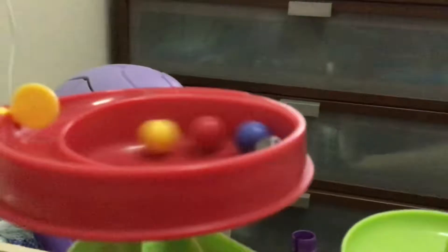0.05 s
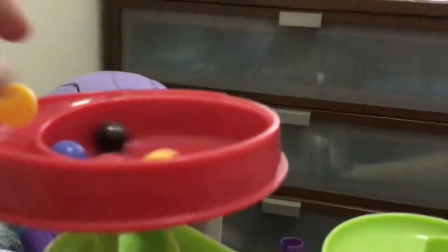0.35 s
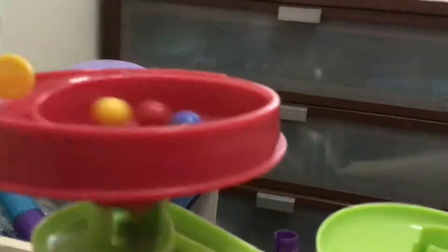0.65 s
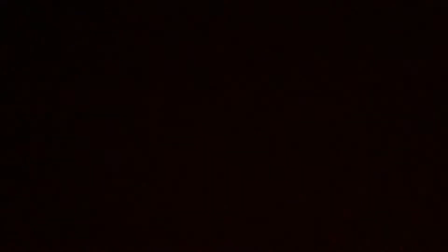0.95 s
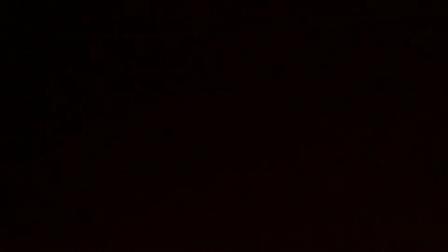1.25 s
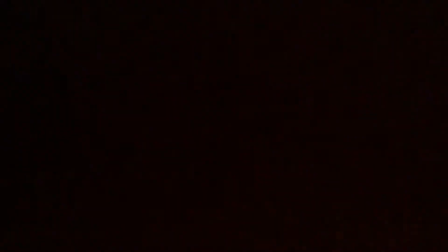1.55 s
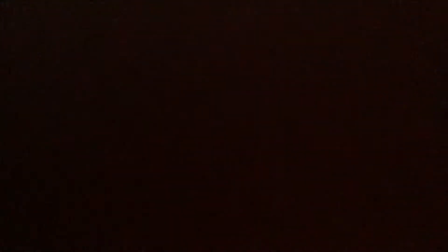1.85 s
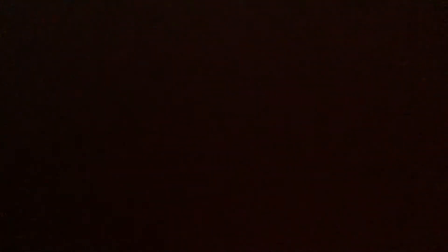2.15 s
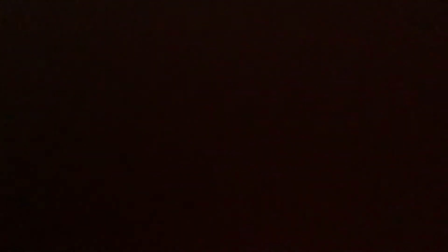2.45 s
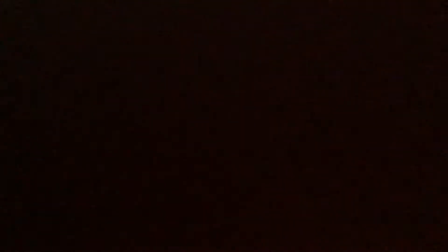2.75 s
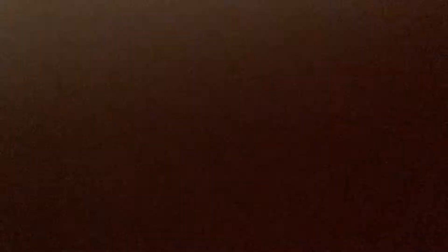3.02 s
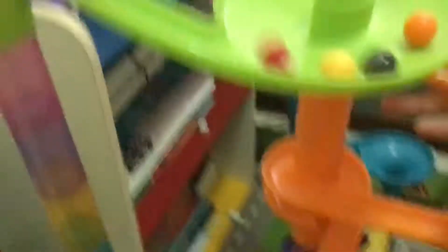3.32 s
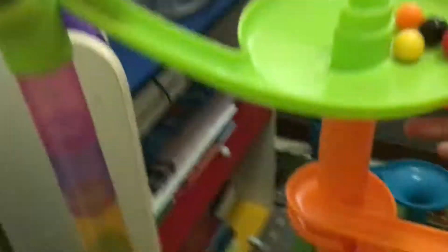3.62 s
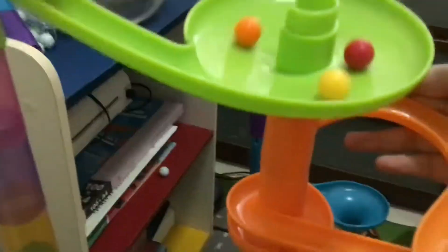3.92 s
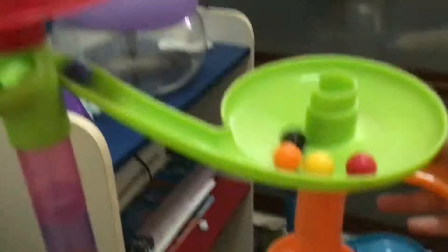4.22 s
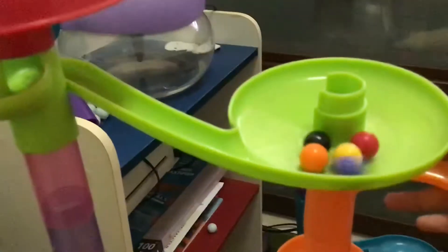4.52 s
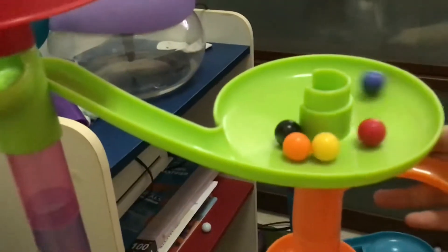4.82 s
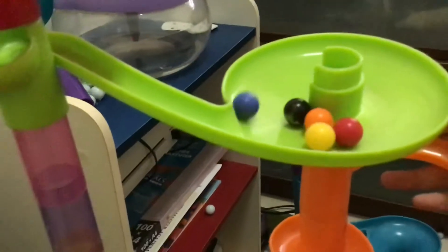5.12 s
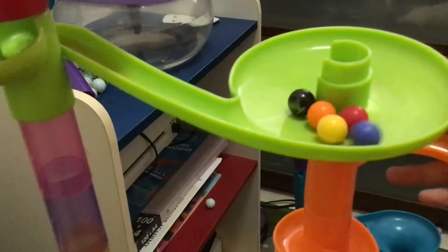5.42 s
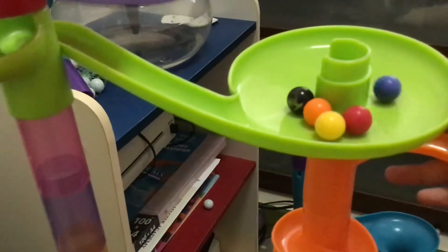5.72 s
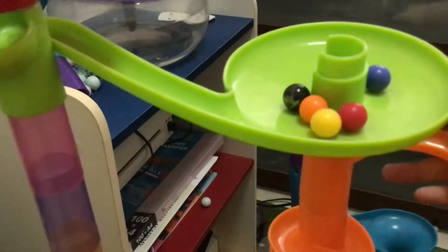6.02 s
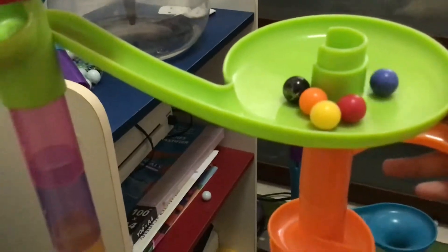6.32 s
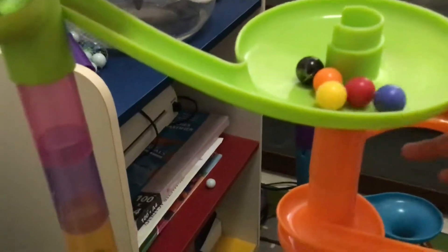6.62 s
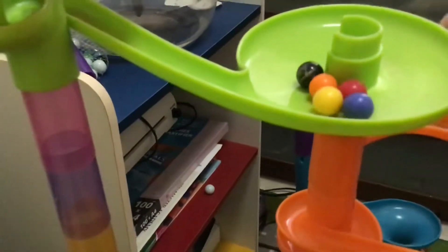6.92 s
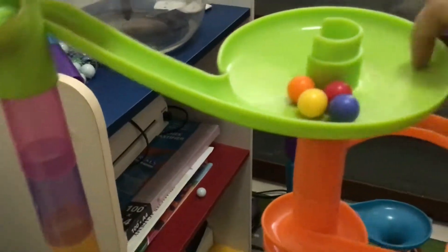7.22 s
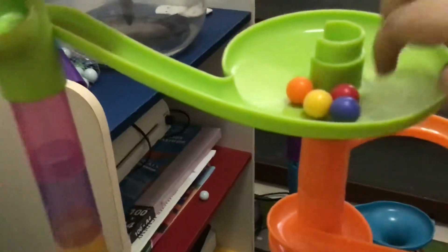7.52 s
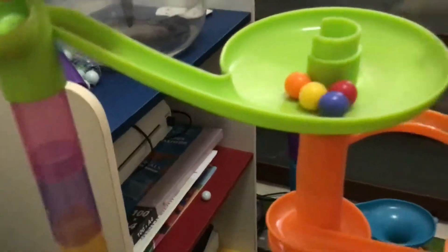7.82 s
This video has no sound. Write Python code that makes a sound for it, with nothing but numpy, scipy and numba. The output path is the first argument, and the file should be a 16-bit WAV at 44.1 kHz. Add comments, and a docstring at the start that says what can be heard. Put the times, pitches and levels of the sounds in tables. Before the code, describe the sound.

Glass marbles roll and clatter through a plastic toy run, rattling down a hollow tube, then clicking together and settling.

```python
"""A small furnished room, where glass marbles run through a plastic toy tower close to a hand-held phone.
They circle two bowls, step down a hollow tube, click against each other and come to rest; then a finger
pushes one down the spout. Each impact excites the resonances of the plastic and of the air in the tube,
while rolling excites the shell through a stream of tiny contacts. The phone is bumped and brushed as it
is moved; behind it all lie a short reverberation and a faint hum."""
import sys
import numpy as np
from scipy import signal
from scipy.fft import rfft, irfft, next_fast_len
from scipy.io import wavfile
from numba import njit

SR = 44100
rng = np.random.default_rng(int(sys.argv[2]) if len(sys.argv) > 2 else 0)


def materialize(psi):
    """Save the field psi as 16-bit PCM at rate SR to the path in sys.argv[1].

    A 1-D psi becomes a single channel; in a 2-D psi each row is a channel.
    """
    bounded = np.clip(np.atleast_2d(psi).T, -1, 1)
    quanta = np.round(bounded * 32767).astype(np.int16)
    wavfile.write(sys.argv[1], SR, quanta)


N = 355446
TIME = np.arange(N) / SR

# drops from step to step in the tube: t/s, level/dB, treble slope/(dB/octave)
TUBE_HITS = [(0.7911, 7, 7), (0.8529, 2.5, 2.5), (0.8693, -3.5, -4), (1.4536, 5.5, -13.5),
             (1.4733, -6, -3.5), (1.4845, -2.5, -2.5), (1.5225, 3.5, -6), (1.5384, 13.5, 5),
             (1.5856, 1, -16.5), (1.6185, 9, 2.5), (1.6432, -1, 0), (1.6859, 6.5, 3), (1.7406, 5.5, 2.5),
             (1.7585, 8.5, 4), (1.8119, 11, -55.5), (1.8205, 10.5, 5), (1.8466, 6, -2), (1.8609, 8, 6.5),
             (1.9036, 9, 5.5), (1.9617, 1, -18), (1.9683, 5, 3.5), (2.0081, -0.5, -22),
             (3.5466, 17.5, -3.5), (3.5825, 4.5, -1), (3.6431, 14.5, -0.5), (3.7053, 4, -4),
             (3.7208, 12.5, -5), (3.7734, 11.5, -8.5), (3.8158, -3.5, -13), (3.829, 8.5, -10),
             (3.9133, -1.5, -21), (3.9576, 1.5, -12)]
# frequency response of the tube wall: f/Hz, level/dB
TUBE_SPECTRUM = [(250, -34), (580, -16), (900, -21), (1700, -11), (2400, -4.5), (2900, -9), (3700, -3.5),
                 (5000, -6), (6200, -17), (7500, -24), (8900, -8.5), (11000, -23.5), (14000, -27.5),
                 (16000, -44.5)]
# modes of the tube, the lowest that of its air: f/Hz, T60/s, gain at resonance/dB
TUBE_MODES = [(569, .32, 14), (615, .2, 2), (1255, .1, -8), (1660, .12, -3), (3760, .008, -2)]
def tube_drops():
    """Air-column resonance: falling marbles strike the tube, and its wall and enclosed air ring."""
    blows = impacts(TUBE_HITS, TUBE_SPECTRUM, pivot_hz=3700, bass_slope=0, room_db=-2,
                    spread_s=0.0011, ring_db=-2.5, ring_t60=0.031)
    return with_modes(blows, TUBE_MODES)


# knocks on the bowls and the ramp: t/s, level/dB, treble slope/(dB/octave)
BOWL_HITS = [(0.0386, -14, 10), (0.2447, -10, 9), (0.4213, -11.5, 8), (0.5219, -14, 4), (0.6789, 5, 10),
             (0.691, 4.5, 9), (0.9108, -8.5, 8), (0.9739, -7, 7), (0.9905, -12.5, 9.5), (1.1278, -7, 7.5),
             (1.1409, -0.5, -8), (1.1921, -7.5, 5.5), (1.3801, -9, 6.5), (2.1927, -5, -3.5),
             (2.3001, -15.5, 8.5), (2.394, -2, 1), (2.5198, -4.5, -7), (2.6634, -9.5, 12.5),
             (2.6711, 0, -6), (2.7314, -4.5, -1), (2.789, 2, -2), (2.8303, -11, -15), (2.843, 1, 0.5),
             (2.8699, 0.5, 1), (2.8942, -5, 3), (3.0186, -3, -8.5), (3.1074, -3, 0), (3.1226, -3, -6),
             (3.2844, -3.5, -7), (4.0781, -3.5, -0.5), (4.5301, -3.5, 3), (4.5767, -2.5, 3.5),
             (4.6156, -2, 4.5), (4.6954, -10.5, 3), (4.7471, -8, -9), (4.8461, -13, -1), (4.9188, -15, -2),
             (5.0433, -9, -3.5), (5.2515, -2, 3.5), (5.2724, -0.5, -4.5), (5.4439, -12.5, -5),
             (5.5478, -14.5, -12), (5.8713, -9, 0), (6.5577, -21, -4.5), (6.5885, -20, 6.5),
             (7.0603, -19, -8.5), (7.33, -4.5, 5), (7.7441, -12.5, -2), (7.8627, -16, -4)]
# frequency response of the bowls: f/Hz, level/dB
BOWL_SPECTRUM = [(250, -27.5), (600, -6), (1100, -9.5), (1700, -6.5), (2300, -3.5), (3000, -10.5),
                 (3800, -5.5), (5200, -16.5), (7200, -28), (8800, -21.5), (11500, -40), (16000, -53.5)]
# modes of the bowls: f/Hz, T60/s, gain at resonance/dB
BOWL_MODES = [(1685, 0.07, 5.5), (2074, 0.1, 2.5), (2460, 0.0083, 6)]
def bowl_knocks():
    """Free vibration of a shell: a struck bowl rings briefly in its damped modes."""
    blows = impacts(BOWL_HITS, BOWL_SPECTRUM, pivot_hz=2360, bass_slope=5.7, room_db=0,
                    spread_s=0.0017, ring_db=-4, ring_t60=0.03)
    return with_modes(blows, BOWL_MODES)


# hard clicks, mostly marble on marble: t/s, level/dB, treble slope/(dB/octave)
GLASS_HITS = [(0.7188, 8, 2), (3.1677, -8, -6), (4.2149, -18.5, 5), (4.2642, -22.5, -2),
              (4.3572, -15.5, 0.5), (4.4422, -23.5, 1), (4.6374, -13, 2), (4.6436, -9.5, -13),
              (5.0546, -19.5, -4), (5.3478, -26.5, 3.5), (5.4519, -26, -6), (6.7149, -33, -7),
              (6.8488, -26.5, 2), (6.9771, -37, -0.5)]
# spectrum of a click: f/Hz, level/dB
GLASS_SPECTRUM = [(250, -23.5), (900, -16), (2200, -2), (3500, 1), (4800, 6), (6100, -1.5), (8200, 1),
                  (9700, -4.5), (11500, -7.5), (13500, -24), (16000, -36)]
# modes that a click excites, the lowest that of the tube's air: f/Hz, T60/s, gain at resonance/dB
TOWER_MODES = [(570, .45, 6), (8090, .025, -13), (11800, .002, -4)]
def glass_clicks():
    """Elastic collision: stiff glass makes a very short contact, so the click is bright."""
    blows = impacts(GLASS_HITS, GLASS_SPECTRUM, pivot_hz=3400, bass_slope=-3.5, room_db=-1,
                    spread_s=0.0006, ring_db=-1.5, ring_t60=0.028)
    return with_modes(blows, TOWER_MODES)


# one marble falling through the lower bowl's spout: t/s, level/dB, treble slope/(dB/octave)
SPOUT_HITS = [(7.3573, 14.8, 4), (7.4258, 4.2, -2.5), (7.4631, 9.3, 3), (7.5419, 3.3, 3.5),
              (7.5851, 0.5, -29)]
# frequency response of the spout: f/Hz, level/dB
SPOUT_SPECTRUM = [(250, -19.5), (800, -24), (1500, -14), (2300, 0), (3100, -10), (4200, 1.5), (5300, -5.5),
                  (6200, -13.5), (7000, -14), (7800, -21.5), (8700, -18), (11500, -31), (14000, -32),
                  (16000, -41)]
def spout_fall():
    """Impulse excitation: each rebound of the marble is filtered by the response of the spout."""
    return impacts(SPOUT_HITS, SPOUT_SPECTRUM, pivot_hz=3450, bass_slope=0.19, room_db=2.6,
                   spread_s=0.0025, ring_db=-3.5, ring_t60=0.028)


def impacts(hits, spectrum, pivot_hz, bass_slope, room_db, spread_s, ring_db, ring_t60, size=4096):
    """Contact time sets bandwidth: harder blows are brighter. Returns direct sound and room feed."""
    hard_slope, hard_bass_slope = 3, 2.3  # dB/octave: a contact counts as hard; the bass it then gains
    near_dryness = 0.12  # dB less room per dB of level: the loudest blows land nearest the phone
    direct, to_room = np.zeros(N), np.zeros(N)
    t, hz = np.arange(size) / SR, np.fft.rfftfreq(size, 1 / SR)
    octave = np.log2(np.maximum(hz, 300) / pivot_hz)  # both slopes hinge on the main resonance
    below, above = np.minimum(octave, 0), np.maximum(octave, 0)
    lead = 64  # samples
    taper = signal.windows.tukey(size, 2 * lead / size)
    body_db = along(hz, spectrum) - 10 * np.log10(1 + (170 / (hz + 1)) ** 4)  # small parts radiate no bass
    for start, db, treble_slope in hits:
        crack_noise, ring_noise = rng.standard_normal((2, size))
        # bending waves cross the shell and spread the contact into a crack of a millisecond or two
        crack = rfft(crack_noise * np.exp(-(t / spread_s) ** 2))
        crack /= np.abs(crack) ** .7  # partly flatten the spectrum
        crack /= np.sqrt(np.mean(np.abs(crack) ** 2))
        # the dense modes of the plastic ring on briefly
        ring = ring_noise * fade(t, ring_t60) * (1 - np.exp(-t / spread_s))
        ring = rfft(ring) * undb(ring_db) / np.linalg.norm(ring)
        low_slope = bass_slope - hard_bass_slope * np.tanh(treble_slope / hard_slope)
        response = minimum_phase(db + body_db + low_slope * below + treble_slope * above)
        blow = np.roll(irfft((crack + ring) * response), lead) * taper
        add(direct, start - lead / SR, blow)
        add(to_room, start - lead / SR, blow * undb(room_db - near_dryness * db))
    return np.array([direct, to_room])


def with_modes(blows, modes, size=16384):
    """Modal superposition: the blows, plus a damped sinusoid for each mode that they excite."""
    t = np.arange(size) / SR
    response = 0
    for hz, t60, db in modes:
        decay = fade(t, t60)
        response += 2 * undb(db) * decay / decay.sum() * np.cos(2 * np.pi * hz * t)
    return blows + signal.fftconvolve(blows, response[None], axes=1)[:, :N]


# spells of rolling: start/s, end/s, level/dB, level change/(dB/s), relative grit/dB, relative rumble/dB
ROLLS = [(-0.05, 0.667, -53.5, 3.5, -11, -15), (0.8, 1.3, -48.5, -20, -22.5, -10.5),
         (1.32, 1.924, -53, 26, -16, -13.5), (1.946, 2.353, -50, 1, -22.5, -9.5),
         (2.368, 3.26, -47.5, -5, -18.5, -8.5), (3.229, 3.518, -52, 42, -8, -10),
         (3.6, 3.916, -51, 8.5, -6, -8.5), (4.114, 5.56, -57, -5, -16, -4.5)]
# spectra of the shell under a rolling marble, of its grit and of its rumble: f/Hz, level/dB
SHELL_SPECTRUM = [(700, -19), (1200, -8.5), (1700, -4.5), (2400, -0.5), (3000, -7), (3800, -11.5),
                  (5000, -36), (12000, -60)]
GRIT_SPECTRUM = [(2500, -31.5), (4200, -5.5), (5200, 0), (6200, -8), (7500, -10), (8800, -8), (11000, -16),
                 (16000, -31.5)]
RUMBLE_SPECTRUM = [(120, -25.5), (280, -5), (480, -2), (700, 1), (950, -7), (1300, -5), (2200, -40),
                   (12000, -58.5)]
def rolling():
    """Roughness excitation: marbles patter over the grain of the plastic and drive the shell."""
    shell_gain = grit_gain = rumble_gain = 0
    for start, end, db, db_per_s, grit_db, rumble_db in ROLLS:
        gain = undb(db) * roll_envelope(start, end, db_per_s)
        shell_gain += gain
        grit_gain += gain * undb(grit_db)
        rumble_gain += undb(db + rumble_db) * roll_envelope(start, end, db_per_s / 2)
    patter = smear(grains(per_s=890, scatter_db=4.5) * undb(3.2 * wander(22)), t60=0.016)
    centre_hz, width_hz = track_resonance()
    hops = smear(grains(per_s=70, scatter_db=2.2), t60=.005)  # a marble clears a flaw and lands
    contacts = unit(patter) + undb(-4.5) * unit(hops)
    singing = resonator(resonator(contacts, centre_hz, width_hz), centre_hz, width_hz)
    singing = unit(singing * undb(1.3 * wander(10)))
    shell = undb(-4) * (singing + tint(patter, SHELL_SPECTRUM)) + undb(-3.5) * tint(hops, SHELL_SPECTRUM)
    # only the sharpest contacts reach the treble, in spurts
    spurts = smear(grains(per_s=300, scatter_db=-1), t60=0.0014) * undb(2.7 * wander(37))
    grit = tint(unit(spurts) + unit(hops), GRIT_SPECTRUM)
    rumble = tint(grains(per_s=3500, scatter_db=2.5), RUMBLE_SPECTRUM)
    return shell * shell_gain + grit * grit_gain + rumble * rumble_gain


def track_resonance():
    """Driving-point response: the shell's resonance depends on where it is touched. Centre and width."""
    upper_bowl_hz, ramp_hz, lower_bowl_hz = 1740, 2960, 2340
    ramp_start_s, settle_s = 2.38, 0.73
    in_upper_bowl = TIME < ramp_start_s
    on_ramp = np.exp(-((TIME - ramp_start_s) / settle_s) ** 2)
    track_hz = np.where(in_upper_bowl, upper_bowl_hz, lower_bowl_hz + (ramp_hz - lower_bowl_hz) * on_ramp)
    centre_hz = track_hz * np.exp(.04 * wander(110))  # each contact falls on another spot
    width_hz = np.where(in_upper_bowl, 720., 560.)  # the upper bowl is more damped
    return centre_hz, width_hz


def roll_envelope(start, end, db_per_s, attack_s=0.074, stop_t60=0.24):
    """Rolling noise follows speed: it sets in, gains or loses level steadily, then decays."""
    onset = np.clip((TIME - start) / attack_s, 0, 1)
    speed_gain = undb(db_per_s * (np.clip(TIME, start, end) - start))
    return onset * speed_gain * fade(np.maximum(TIME - end, 0), stop_t60)


def smear(x, t60, size=512):
    """Dispersion: each tiny impact rattles through the shell for a moment, little changed in colour."""
    response = rfft(rng.standard_normal(size) * fade(np.arange(size) / SR, t60), 4 * size)
    flattened = irfft(response / np.abs(response) ** .5)[:size]
    return signal.fftconvolve(x, flattened)[:N]


# strokes of fingers and sleeve on the phone: middle/s, level/dB, half length/s
RUBS = [(.33, -52.5, 0.16), (.97, -51.5, 0.11), (1.22, -50, 0.035), (1.39, -49, 0.062), (2.45, -55, .06),
        (3.1, -57.5, 0.17), (3.48, -35.5, 0.1), (3.9, -57, 0.13)]
# spectrum of the rubbing: f/Hz, level/dB
RUB_SPECTRUM = [(25, -29), (55, -1.5), (100, -1.5), (220, -4.5), (350, -16), (600, -23), (1200, -28),
                (12000, -66)]
def rubbing():
    """Stick-slip friction: small slips on the case reach the microphone as a low rumble."""
    return tint(grains(per_s=980, scatter_db=3), RUB_SPECTRUM) * strokes(RUBS)


# cloth sliding past as the arms move: middle/s, level/dB, half length/s
SWISHES = [(1.08, -47, 0.018), (3.5, -39, 0.12), (7.19, -56, 0.094)]
# spectrum of the cloth: f/Hz, level/dB
SWISH_SPECTRUM = [(200, -35), (500, -3.5), (900, -22.5), (1600, -29), (2500, -11), (4500, -5.5),
                  (7000, -18), (9000, -13), (12000, -21.5), (16000, -36)]
def cloth_swish():
    """Sliding friction: dense, tiny contacts of cloth merge into a fluttering hiss."""
    hiss = tint(grains(per_s=4600, scatter_db=2.5), SWISH_SPECTRUM)
    return hiss * strokes(SWISHES) * undb(1.6 * wander(60))


# soft bumps, mostly on the phone's case; the first, at 0.719 s, is a hand knocking the toy tower: t/s, peak
# level/dB, f/Hz, length/s, scuff level/dB
BUMPS = [(0.719, -22.5, 250, .0038, -22.5), (0.721, -26, 104, 0.0085, -32), (0.88, -31.5, 97, 0.036, -54),
         (1.083, -37, 330, 0.0056, -43), (1.194, -28.5, 130, 0.017, -43), (3.167, -33.5, 191, 0.0032, -33),
         (3.430, -26.5, 102, 0.025, -40), (3.539, -28, 210, 0.025, -40.5), (3.560, -35, 92, 0.024, -61),
         (3.682, -36, 130, 0.0095, -72), (4.441, -35, 102.5, 0.014, -70)]
# spectrum of the scuff in a bump: f/Hz, level/dB
SCUFF_SPECTRUM = [(120, -27.5), (300, -6), (550, -5), (1000, -11), (2200, -16.5), (12000, -57)]
def case_bumps():
    """Structure-borne sound: a soft contact sends a low pulse and a scuff through the case."""
    bumps, t = np.zeros(N), TIME[:SR // 4]
    noise = tint(rng.standard_normal(N), SCUFF_SPECTRUM)
    for start, db, hz, length, scuff_db in BUMPS:
        swell = (2 * np.e * t / length * np.exp(-2 * t / length)) ** 4  # peaks at 1 at half the length
        thump = undb(db) * np.sin(2 * np.pi * hz * t)
        scuff = undb(scuff_db) * np.roll(noise, -int(start * SR))[:len(t)]
        add(bumps, start - length / 10, swell * (thump + scuff))
    return bumps


# reverberation by band: f/Hz, T60/s, level/dB
ROOM_BANDS = [(150, .3, -30.5), (600, 0.62, -2.5), (1960, 0.33, -7), (4600, 0.4, -6), (9000, 0.38, -8),
              (16000, .25, -15.5)]
def reverberation(x, first_s, build_s, size=32768):
    """Diffuse field: reflections from furniture and walls build up, then decay band by band."""
    t, hz = np.arange(size) / SR, np.fft.rfftfreq(size, 1 / SR)
    noise = rfft(rng.standard_normal(size))
    onset = 1 - np.exp(-np.maximum(t - first_s, 0) / build_s)
    centres_hz = np.array(ROOM_BANDS)[:, 0]
    response = 0
    for (_, t60, db), weights in zip(ROOM_BANDS, np.eye(len(ROOM_BANDS))):
        band = irfft(noise * along(hz, np.c_[centres_hz, weights]))
        envelope = onset * fade(t, t60)
        response += undb(db) * band * envelope / np.linalg.norm(envelope)
    return signal.fftconvolve(x, response)[:N]


# partials of the hum: f/Hz, rms level/dB
HUM_PARTIALS = [(97.5, -66), (143, -71), (247, -74), (290, -76), (398, -83), (745, -78.5)]
# spectrum of the quiet room: f/Hz, level/dB
AMBIENT_SPECTRUM = [(22, -52.5), (33, -27.5), (55, -3.5), (100, -9.5), (180, -9), (330, -14), (500, -18.5),
                    (660, -21), (755, -19.5), (880, -26), (2000, -31), (4500, -36.5), (8000, -48),
                    (16000, -52.5)]
def room_hum(noise_db=-60):
    """Line spectrum over a continuous one: tones that waver in phase, above dull room noise."""
    hum = sum(undb(db) * np.sqrt(2) * np.sin(2 * np.pi * hz * TIME + 0.96 * wander(8.3))
              for hz, db in HUM_PARTIALS)
    return hum + undb(noise_db) * tint(rng.standard_normal(N), AMBIENT_SPECTRUM)


def strokes(rows):
    """Gaussian envelopes: each hand movement swells and dies away smoothly."""
    return sum(undb(db) * np.exp(-((TIME - middle) / half) ** 2) for middle, db, half in rows)


def grains(per_s, scatter_db):
    """Poisson process: tiny impacts at random times and of unequal size."""
    occurs = rng.random(N) < per_s / SR
    size_db = scatter_db * np.minimum(rng.exponential(size=N), 4)
    return occurs * undb(size_db) * rng.choice([-1, 1], N)


def wander(per_s):
    """Random modulation: a line through random points, at rms 1."""
    knots = rng.standard_normal(2048)
    return unit(np.interp(TIME * per_s, np.arange(len(knots)), knots))


@njit
def resonator(x, hz, width_hz):
    """Second-order resonance: a state-variable band-pass with moving centre and width."""
    y, band, low = np.empty(len(x)), 0., 0.
    for i in range(len(x)):
        tuning, damping = np.tan(np.pi * hz[i] / SR), width_hz[i] / hz[i]
        velocity = (band + tuning * (x[i] - low)) / (1 + tuning * (tuning + damping))
        band = 2 * velocity - band
        low += 2 * tuning * velocity
        y[i] = damping * velocity
    return y


def minimum_phase(db):
    """Causality: folding the cepstrum gives the minimum-phase spectrum with these gains."""
    cepstrum = irfft(np.log(undb(db)))
    half = len(cepstrum) // 2
    cepstrum[1:half] *= 2
    cepstrum[half + 1:] = 0
    return np.exp(rfft(cepstrum))


def tint(x, spectrum):
    """Linear filtering: weight a signal by a spectrum, then scale to rms 1."""
    size = next_fast_len(N)
    gain = undb(along(np.fft.rfftfreq(size, 1 / SR), spectrum))
    return unit(irfft(rfft(x, size) * gain, size)[:N])


def along(hz, rows):
    """Interpolation of a two-column table on a log-frequency axis."""
    rows = np.array(rows)
    return np.interp(np.log(hz + 1), np.log(rows[:, 0]), rows[:, 1])


def add(out, start_s, x):
    """Superposition of a short sound at a given time."""
    i = max(int(start_s * SR), 0)
    out[i:i + len(x)] += x[:max(N - i, 0)]


def fade(t, t60):
    """Exponential decay, by 60 dB in t60 seconds."""
    return np.exp(-np.log(1000) * t / t60)


def undb(db):
    """Amplitude ratio of a level in decibels."""
    return 10 ** (np.asarray(db) / 20)


def unit(x):
    """Normalisation to rms 1."""
    return x / np.sqrt(np.mean(x ** 2))


def scene():
    """Superposition: the toy's direct and reverberant sound, handling noise and the room's hum."""
    direct, to_room = tube_drops() + bowl_knocks() + glass_clicks() + spout_fall() + rolling()
    reflections = reverberation(to_room, first_s=0.0051, build_s=0.002)
    handling = rubbing() + cloth_swish() + case_bumps()
    return (direct + reflections + handling + room_hum())[None]


def record(dry):
    """Band limiting: the phone passes sound between 42 Hz and 16 kHz."""
    thinned = signal.sosfilt(signal.butter(4, 42, "highpass", fs=SR, output="sos"), dry)
    return signal.sosfilt(signal.ellip(8, .2, 70, 16000, fs=SR, output="sos"), thinned)


dry = scene()
out = record(dry)
materialize(out)
```